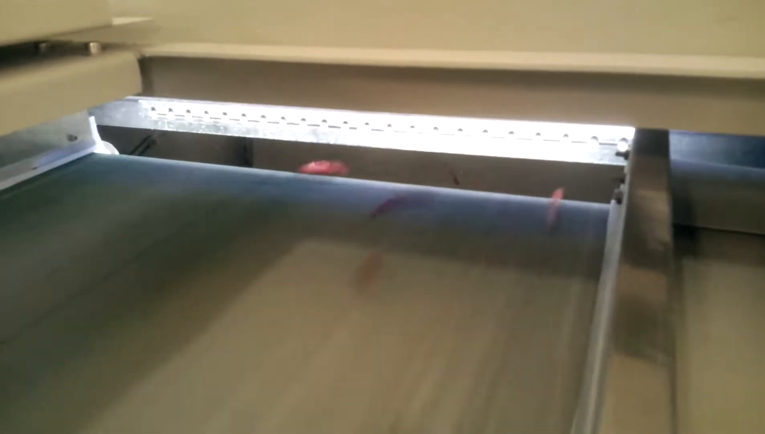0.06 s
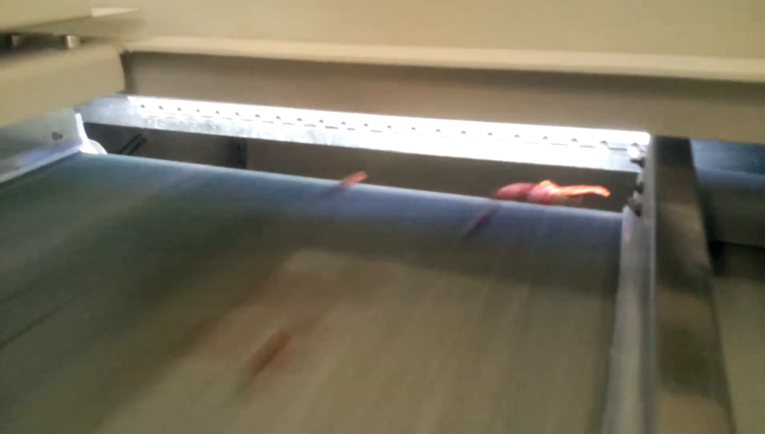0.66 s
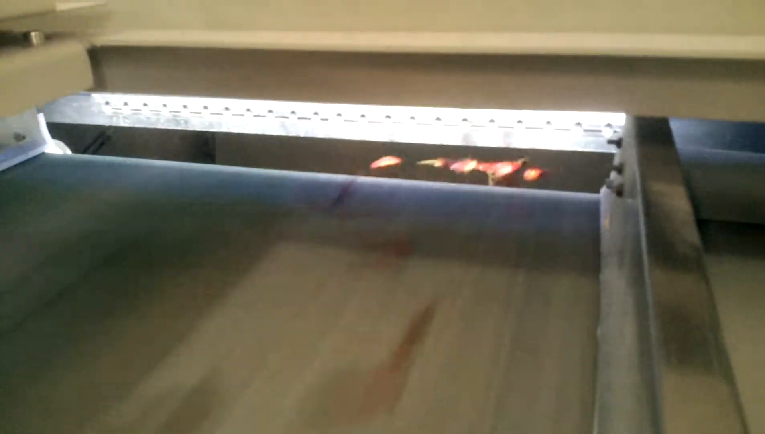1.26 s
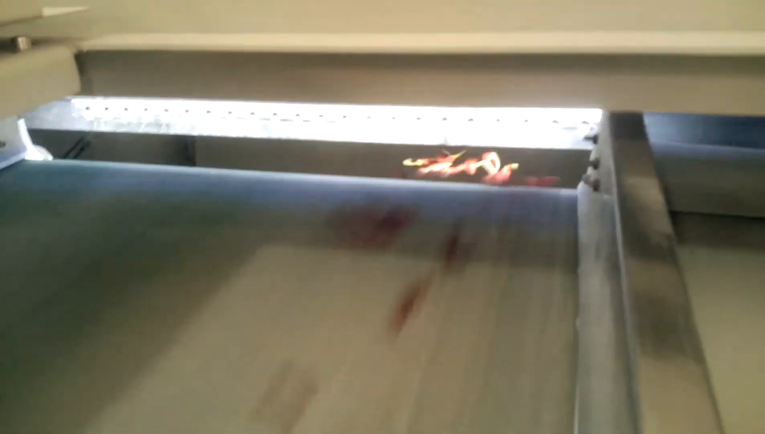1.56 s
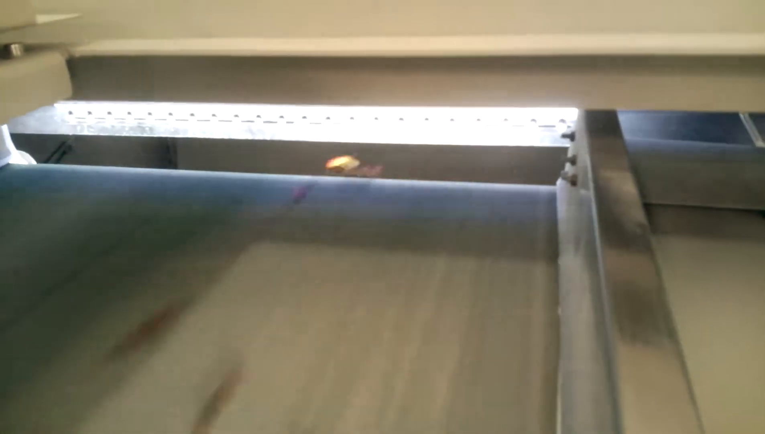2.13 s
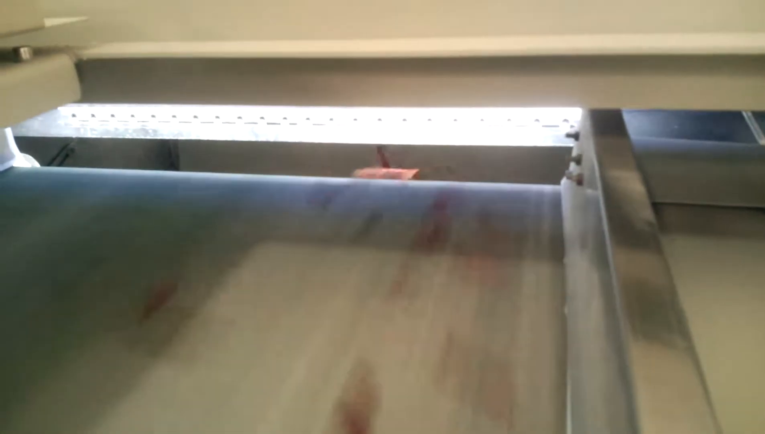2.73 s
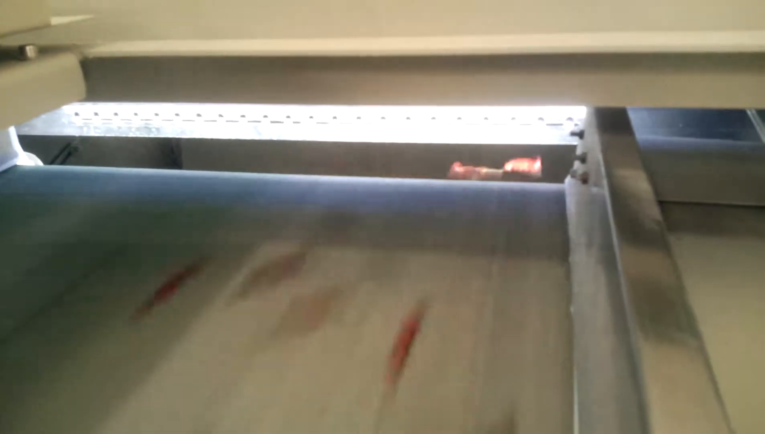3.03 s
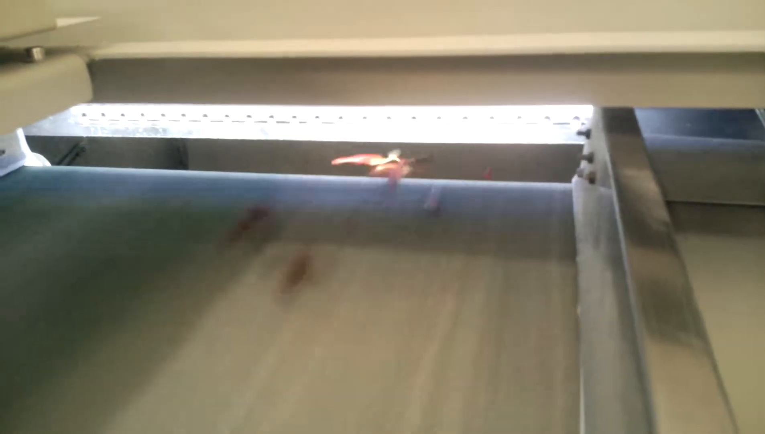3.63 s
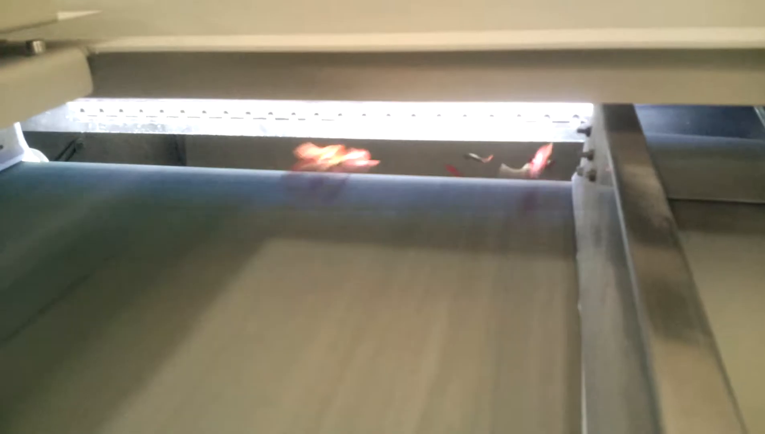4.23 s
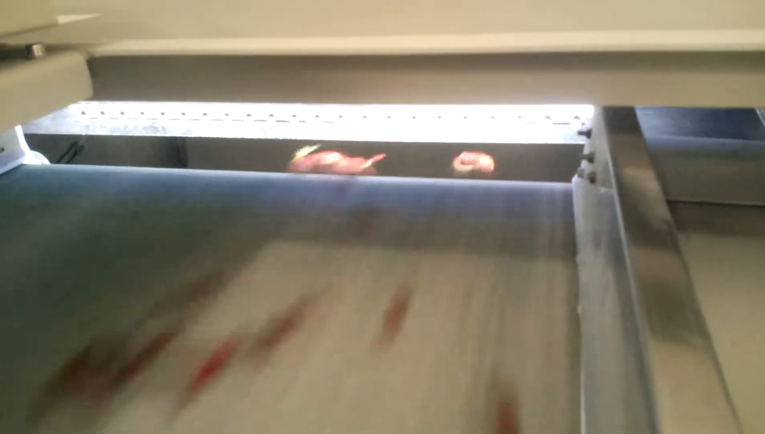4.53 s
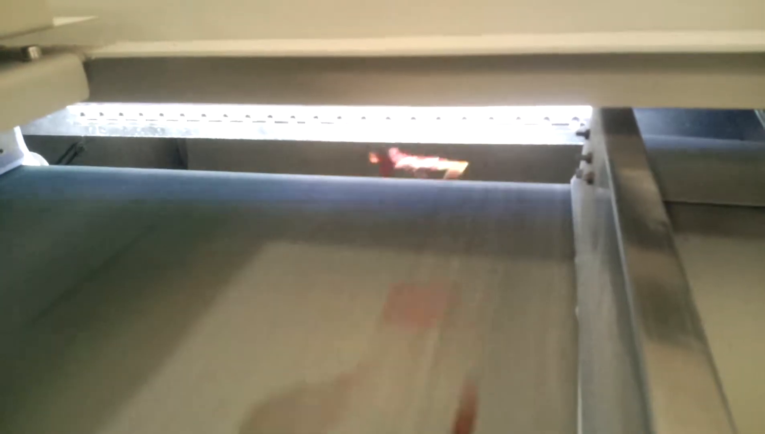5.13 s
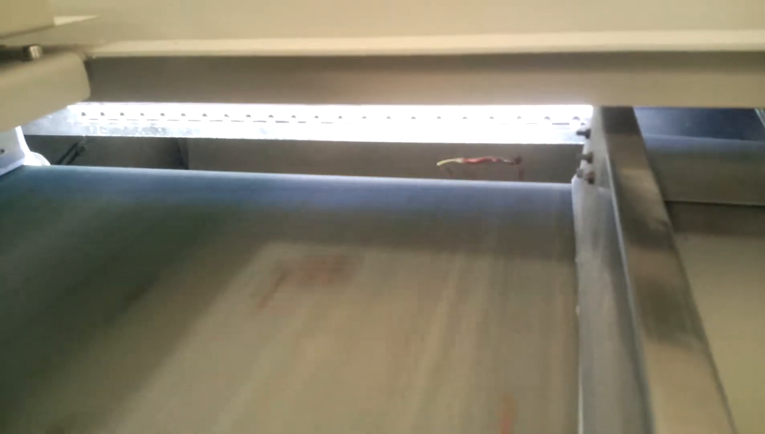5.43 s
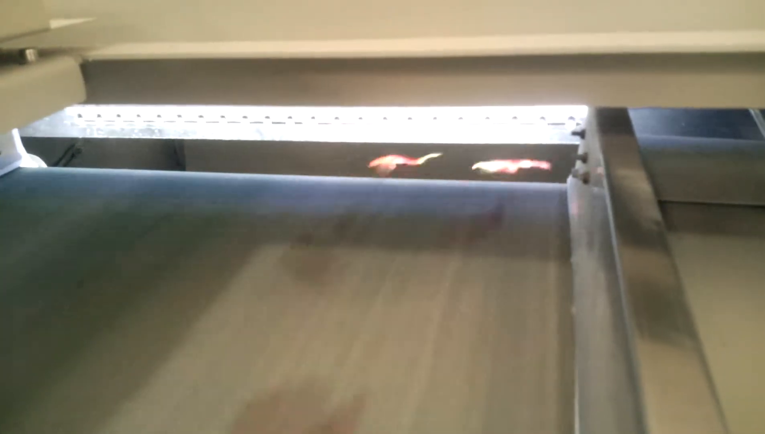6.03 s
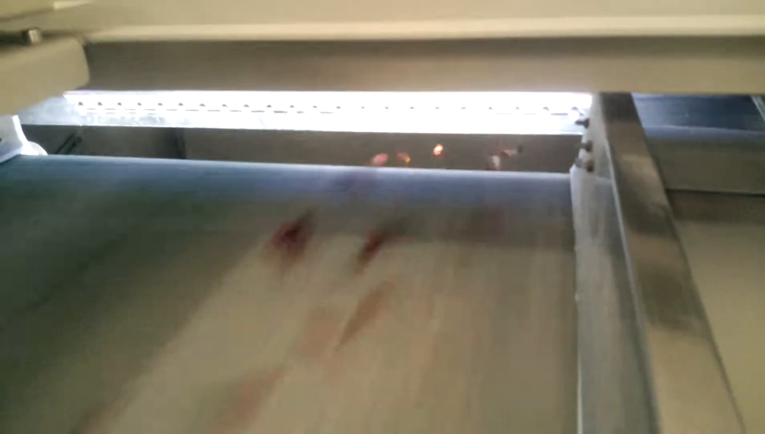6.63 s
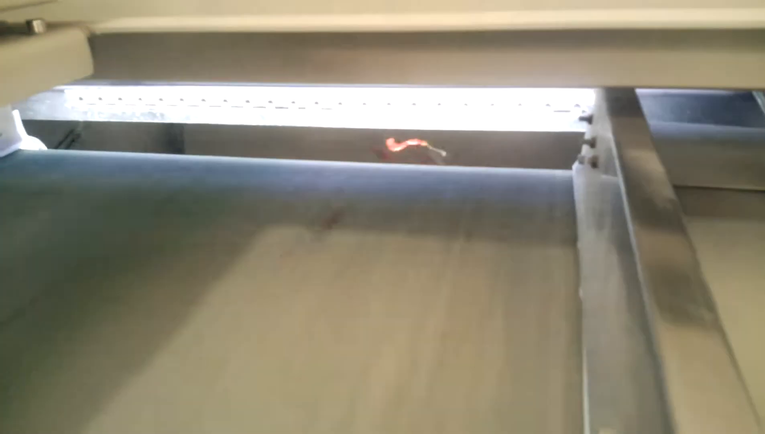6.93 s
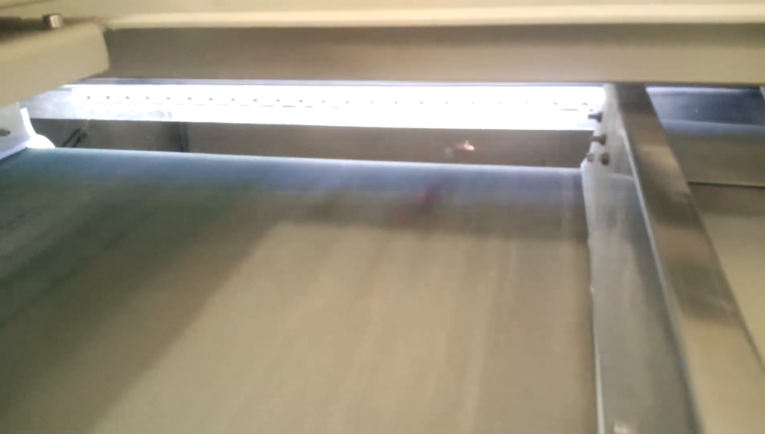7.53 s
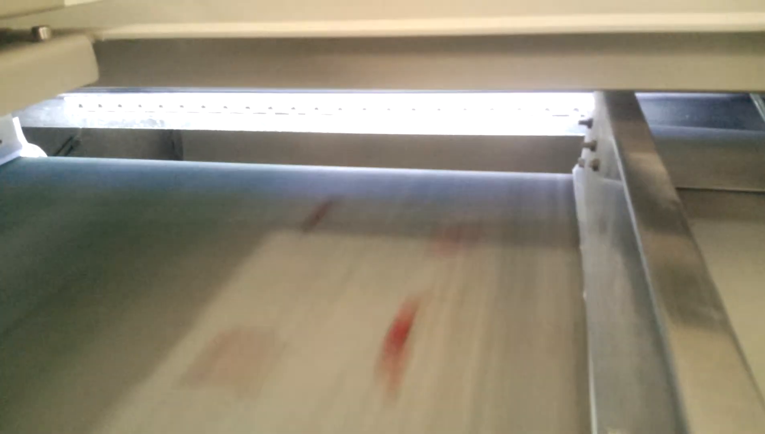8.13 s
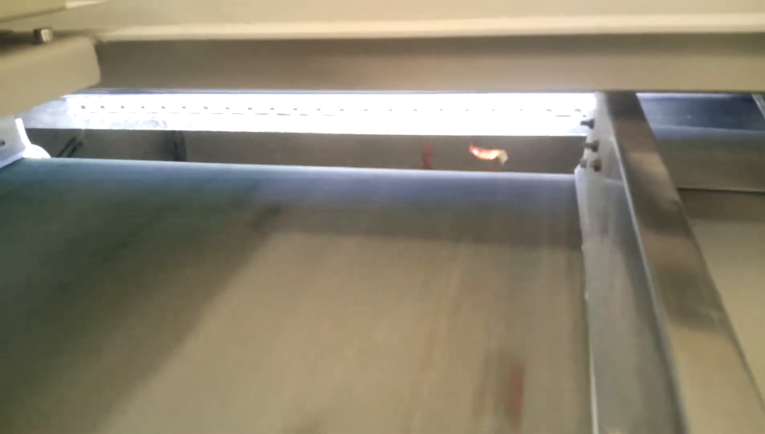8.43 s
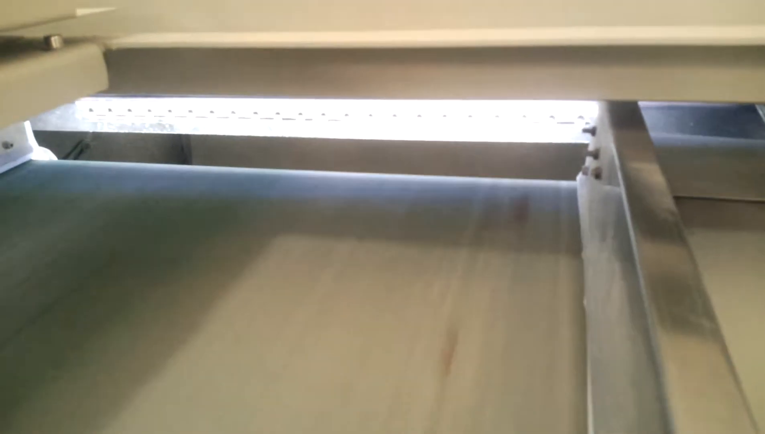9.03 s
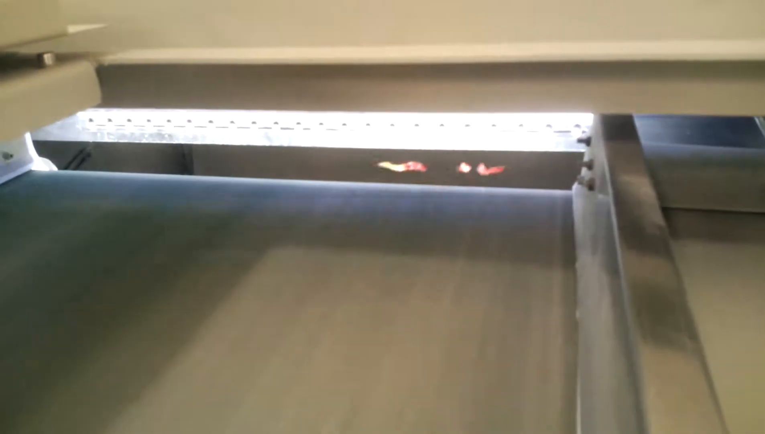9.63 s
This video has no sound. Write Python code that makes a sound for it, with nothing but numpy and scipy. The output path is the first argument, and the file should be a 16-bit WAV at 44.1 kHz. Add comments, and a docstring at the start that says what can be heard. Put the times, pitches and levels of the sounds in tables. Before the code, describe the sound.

Sharp clicks with short air puffs come irregularly from a sorting machine over steady belt hiss, a high swelling whine and faint hum.

```python
"""Optical sorter on the factory floor

Microphone just above the fast conveyor belt. Ejector valves click open and spit short puffs of air
at passing pieces, ringing in the sheet-metal housing and echoing faintly in the hall. The drive whines,
swelling once with every lap of the belt. Underneath, the belt hisses and the mains and motors hum."""
import sys
import numpy as np
from scipy import signal
from scipy.fft import rfft, irfft
from scipy.io import wavfile

SR = 44100
rng = np.random.default_rng(int(sys.argv[2]) if len(sys.argv) > 2 else 0)


def file_out(sig):
    """Save sig as 16-bit WAV at sys.argv[1]."""
    # one column per channel
    cols = np.atleast_2d(sig).T
    # limit, then scale
    lim = np.clip(cols, -1, 1)
    pcm = np.round(lim * 32767).astype(np.int16)
    wavfile.write(sys.argv[1], SR, pcm)


N = 431298
TIME = np.arange(N) / SR
LAP_S, MAINS_HZ, TOP_EDGE_HZ = 1.76, 50, 7330

# pieces blown off the belt: (time [s], relative click level [dB], relative puff level [dB], ring [Hz])
EJECTIONS = [(0.316, -20.5, -41, 4670), (.392, -18.5, -37, 4440), (.497, -22, -37.5, 3970),
             (.576, -12.5, -35.5, 5100), (.691, -19, -33.5, 4400), (.7655, -19.5, -36.5, 4950),
             (.867, -19.5, -45, 4230), (0.908, -20.5, -37.5, 4630), (1.384, -15, -31.5, 4290),
             (1.437, -20, -37.5, 4370), (1.457, -23, -40, 4460), (1.578, -17, -40, 4680),
             (1.652, -14.5, -34.5, 3630), (1.704, -17.5, -34.5, 4340), (1.737, -21, -41, 4600),
             (1.845, -23, -31.5, 4430), (2.326, -21, -39.5, 3760), (2.390, -19, -37.5, 3580),
             (2.410, -19, -42, 6040), (2.713, -15.5, -42, 3730), (2.746, -19, -29, 4860),
             (2.827, -12, -34.5, 4380), (3.038, -22, -33.5, 4410), (3.057, -16, -34, 4400),
             (3.107, -23.5, -41, 3640), (3.173, -20, -40.5, 4570), (3.736, -21, -38.5, 4020),
             (3.799, -16.5, -35.5, 4330), (3.843, -18, -39, 4080), (3.932, -25.5, -36.5, 4300),
             (4.134, -15, -35, 4250), (4.233, -20.5, -33.5, 4160), (4.484, -22, -37.5, 5100),
             (4.732, -15, -33.5, 4450), (4.803, -17.5, -34, 3650), (4.874, -15.5, -38, 4280),
             (4.883, -18, -39.5, 4530), (5.0698, -14.5, -34, 3830), (5.079, -12, -28, 3900),
             (5.101, -30, -38.5, 4300), (5.181, -16, -31, 5400), (5.2802, -21, -39, 3850),
             (5.326, -23, -33, 4500), (5.759, -16, -36, 3850), (5.820, -17.5, -35.5, 5270),
             (5.862, -10.5, -32, 4700), (6.007, -14.5, -36.5, 4300), (6.141, -20, -33.5, 5500),
             (6.5035, -16, -47, 4090), (6.512, -18.5, -31.5, 4500), (6.595, -18.5, -35.5, 3800),
             (6.814, -18, -31.5, 3700), (6.873, -25, -39, 4380), (6.968, -22.5, -39.5, 4040),
             (8.152, -19, -30, 3800), (8.221, -18.5, -41, 4230), (8.507, -16, -31.5, 3950),
             (9.011, -21.5, -42, 3840)]
# spectra of valve click, air puff and belt hiss: (frequency [Hz], relative level [dB])
CLICK_SPECTRUM = [(100, -28.5), (500, -13), (1500, -16.5), (2700, -9.5), (3350, -8), (3700, -5), (4300, 2),
                  (5000, -6), (5900, -3.5), (7200, -18)]
PUFF_SPECTRUM = [(50, -29), (130, -9.5), (230, -14), (400, -7.5), (800, -12), (1400, -11), (2400, -6),
                 (3100, -5), (3900, -6.5), (5000, -1), (6000, -6.5), (7200, -17.5)]
BELT_SPECTRUM = [(20, -19.5), (80, -20), (120, -7.5), (230, -3), (300, -0.5), (650, -1), (820, -2.5),
                 (1450, -2.5), (2400, 0.5), (2950, -2), (3700, 3.5), (4500, 4), (5600, -1), (6400, -7),
                 (7200, -11)]
# resonances of the sheet-metal housing: (frequency [Hz], width [Hz], lift at boxed=1 [dB])
HOUSING_MODES = [(355, 43, 2.5), (530, 56, 1.5), (591, 100, 6.5), (930, 48, 4), (1106, 110, 7.5),
                 (1245, 84, 10.5), (1530, 110, 1), (1619, 100, 10.5), (2110, 30, 6), (2347, 170, 5),
                 (2530, 27, 6.5), (4130, 990, 1)]
# ring of the housing: (frequency [Hz], time to fall 60 dB [s])
HOUSING_DECAY = [(200, 0.17), (1000, 0.09), (4000, 0.16), (7000, 0.1)]
# the whine's strong second partial, sagging at the belt's stiffest spot: (time in lap [s], pitch [Hz])
LAP_PITCH = [(0, 1786), (.3, 1787), (.55, 1783), (.73, 1785), (.83, 1772), (.93, 1784), (1.05, 1782),
             (1.25, 1788), (1.5, 1784)]
# the whine's swell, greatest at that spot: (time in lap [s], level [dB])
LAP_SWELL = [(0, -39), (.3, -41), (.42, -49.5), (.57, -39.5), (.9, -35.5), (1.14, -37.5), (1.33, -43.5),
             (1.63, -38.5)]
# brief dips in the whine: (time in lap [s], gain [dB])
LAP_CHOKES = [(.055, -15.5), (.11, -5.5), (.17, -8.5), (0.249, -15.5), (0.519, -3), (.625, -3), (.76, -4),
              (.985, -5.5), (1.04, -5), (1.101, -3), (1.19, -14), (1.295, -12.5), (1.43, -8.5),
              (1.544, -14), (1.68, -14), (1.73, -5)]
# the whine starts softer, then comes up: (time [s], gain [dB])
WHINE_RISE = [(1.1, -5), (1.4, -1.5)]
# the whine's weaker partials: (harmonic [number], level [dB], share of the swell followed [0-1])
WHINE_PARTIALS = [(1, -57.5, 0.18), (3, -47.5, 0.2), (4, -51, 0.34), (5, -53, 0.34), (6, -59, .2),
                  (7, -66.5, .2)]
# slow drift of the belt's hiss: (time [s], gain [dB])
BELT_DRIFT = [(0, 1), (.9, 1.8), (2, 1.65), (3, 1.7), (4, 1.15), (5, 3), (6, 1.5), (7, 1.5), (8, 0.5),
              (9, 1), (9.78, 0.8)]
# mains hum: (harmonic [number], starting level [dB], flutter [0-1], growth [dB/s])
MAINS_PARTIALS = [(1, -67.5, .04, 0), (2, -69.5, .2, 0), (3, -62.5, .25, 0), (4, -63.5, .35, .55)]
# motor tones: (frequency [Hz], level [dB])
MOTOR_TONES = [(338, -62), (471, -66.5), (936, -67), (1222, -65)]


def valves(click_s=0.002, rise_s=0.0023, shut_s=0.0035, click_wet=0.9, puff_wet=0.53):
    """Inside the housing, each valve snaps open, rings its nozzle and blows air until it shuts."""
    click_gain_db, puff_gain_db, ping_gain_db, neighbour_db = -6.5, 2.5, -9, -11
    usual_open_s, usual_puff_db, doubling_db = 0.0099, -34.5, 17.5
    t = np.arange(int(0.16 * SR)) / SR
    ping_envelope = (1 - np.exp(-t / 0.0004)) * np.exp(-t / 0.004)
    clicks, puffs, pings = np.zeros((3, N))
    for s, click_db, puff_db, nozzle_hz in EJECTIONS:
        crack, next_crack, air = rng.standard_normal((3, len(t)))
        ring = echoes(HOUSING_DECAY, t[-1])  # every nozzle has its own paths through the housing
        snap = np.sign(crack) * np.exp(-t / click_s)
        delay_s = rng.uniform(0.003, 0.011)  # the piece's edge trips the next valve too
        add(snap, delay_s, amp(neighbour_db) * np.sign(next_crack) * np.exp(-t / click_s))
        # a bigger piece gets a stronger and longer puff
        open_s = usual_open_s * 2 ** ((puff_db - usual_puff_db) / doubling_db)
        jet = air * (1 - np.exp(-t / rise_s)) * np.exp(-np.maximum(t - open_s, 0) / shut_s)
        add(clicks, s, amp(click_db + click_gain_db) * (snap + click_wet * through(snap, ring)))
        add(puffs, s, amp(puff_db + puff_gain_db) * (jet + puff_wet * through(jet, ring)))
        add(pings, s, amp(click_db + ping_gain_db) * ping_envelope * np.sin(2 * np.pi * nozzle_hz * t))
    clicks = through(clicks, colour(CLICK_SPECTRUM, boxed=1.0))
    puffs = through(puffs, colour(PUFF_SPECTRUM, boxed=1.09))
    return pings + clicks + puffs


def drive_whine(waver_hz=3, wobble_hz=3, roller_hz=8, second_partial_db=0.6):
    """The drive sings on multiples of about 890 Hz; the belt's lap and a roller's turn bend the pitch."""
    second_hz = np.interp(TIME, *np.transpose(LAP_PITCH), period=LAP_S)
    second_hz += waver_hz * wander(16.34)
    second_hz += wobble_hz * tone(roller_hz * TIME, scatter=0.48, rate_hz=0.89)
    turns = np.cumsum(second_hz) / SR / 2  # cycles of the fundamental
    gain = lap_gain()
    whine = amp(second_partial_db) * gain * tone(2 * turns, scatter=0.28, rate_hz=20)
    for harmonic, db, share in WHINE_PARTIALS:
        whine += amp(db) * unit(gain) ** share * tone(harmonic * turns, scatter=0.62, rate_hz=18)
    return whine


def lap_gain(choke_half_s=0.019):
    """The whine's gain: one swell and the same brief chokes in every lap of the belt."""
    db = np.interp(TIME, *np.transpose(LAP_SWELL), period=LAP_S)
    db += np.interp(TIME, *np.transpose(WHINE_RISE))
    for s, choke_db in LAP_CHOKES:
        away_s = (TIME - s + LAP_S / 2) % LAP_S - LAP_S / 2
        db += choke_db * np.exp(-(away_s / choke_half_s) ** 2)
    return amp(db)


def belt_hiss(level_db=-41, flutter_db=0.72):
    """Just below the microphone, the belt rubs over its bed: a steady, slightly fluttering hiss."""
    hiss = through(rng.standard_normal(N), colour(BELT_SPECTRUM, boxed=0.043))
    drift_db = np.interp(TIME, *np.transpose(BELT_DRIFT))
    return hiss * amp(level_db + drift_db + flutter_db * wander(25))


def hum():
    """In the background, the mains supply drones and the motors' tones flutter."""
    mains = sum(amp(db + growth * TIME) * tone(harmonic * MAINS_HZ * TIME, flutter, rate_hz=13)
                for harmonic, db, flutter, growth in MAINS_PARTIALS)
    motors = sum(amp(db) * tone(hz * TIME, scatter=0.66, rate_hz=2) for hz, db in MOTOR_TONES)
    return mains + motors


def tone(turns, scatter, rate_hz):
    """A sine that flutters because part of it, scatter (0-1), arrives by shifting reflections."""
    reflected = (wander(rate_hz) + 1j * wander(rate_hz)) / np.sqrt(2)
    fading = np.sqrt(1 - scatter ** 2) + scatter * reflected
    return np.sqrt(2) * (fading * np.exp(2j * np.pi * turns)).real


def colour(spectrum, boxed, size=4096):
    """Causal response of a spectrum, lifted by the housing's resonances as far as boxed says."""
    hz = np.fft.rfftfreq(size, 1 / SR)
    housing_db = sum(lift / (1 + (2 * (hz - f) / width) ** 2) for f, width, lift in HOUSING_MODES)
    db = read(spectrum, hz) + boxed * housing_db
    log_gain = np.log(amp(np.r_[db, db[-2:0:-1]]))
    minimum_phase = np.exp(signal.hilbert(log_gain).conj())
    response = np.fft.ifft(minimum_phase).real[:size // 2]
    return response / np.sqrt(np.mean(amp(db) ** 2 * (hz < TOP_EDGE_HZ)))  # energy 1 below the edge


def echoes(t60s, length_s, size=128):
    """Dense reflections of energy 1, each band dying at its own speed."""
    hz, t, bands = signal.stft(rng.standard_normal(int(length_s * SR)), SR, nperseg=size)
    decay = amp(-60 * t / read(t60s, hz)[:, None])
    tail = signal.istft(bands * decay, SR, nperseg=size)[1]
    return tail / np.linalg.norm(tail)


def wander(rate_hz):
    """A random curve of rms 1 that moves at up to about rate_hz."""
    hz = np.fft.rfftfreq(4096, N / SR / 4096)
    curve = irfft(rfft(rng.standard_normal(4096)) / np.sqrt(1 + (hz / rate_hz) ** 4))
    return unit(np.interp(TIME, np.linspace(0, N / SR, len(curve)), curve))


def through(x, response):
    """Passes a sound through a response, keeping its length."""
    return signal.oaconvolve(x, response)[:len(x)]


def add(mix, s, sound):
    """Mixes a sound in at s seconds."""
    part = mix[max(round(s * SR), 0):][:len(sound)]
    part += sound[:len(part)]


def read(points, hz):
    """Joins (frequency, value) points on a log-frequency axis."""
    f, value = np.transpose(points)
    return np.interp(np.log(hz + 1), np.log(f + 1), value)


def amp(db):
    """Decibels to gain."""
    return 10 ** (np.asarray(db) / 20)


def unit(x):
    """Scales to rms 1."""
    return x / np.sqrt(np.mean(abs(x) ** 2) + 1e-20)


def scene(hall_db=-8):
    """One microphone above the belt: the valves and their faint hall echo over the running machine."""
    shots = valves()
    hall = echoes(t60s=[(200, 0.19), (4000, 0.56), (7000, 0.54)], length_s=0.86)
    return (shots + amp(hall_db) * through(shots, hall) + belt_hiss() + hum() + drive_whine())[None]


def record(dry):
    """A narrow-band recorder with a steep upper edge."""
    lowpass = signal.firwin(201, TOP_EDGE_HZ, window=("kaiser", 8), fs=SR)
    return signal.oaconvolve(dry, lowpass[None], "same")


dry = scene()
out = record(dry)
file_out(out)
```